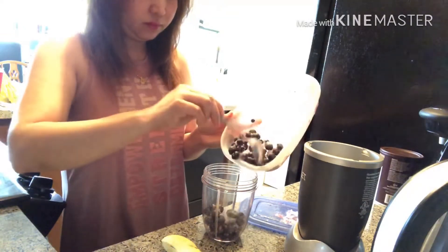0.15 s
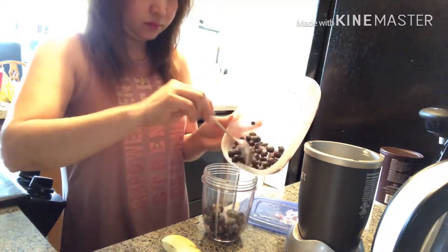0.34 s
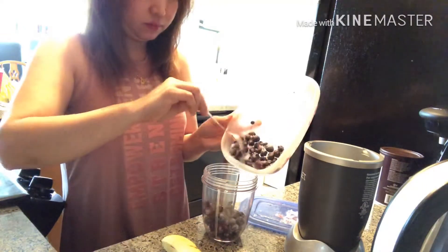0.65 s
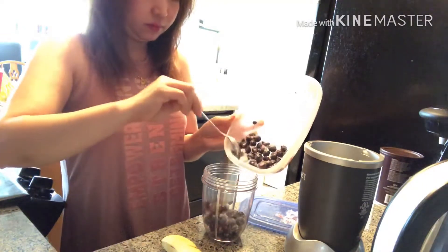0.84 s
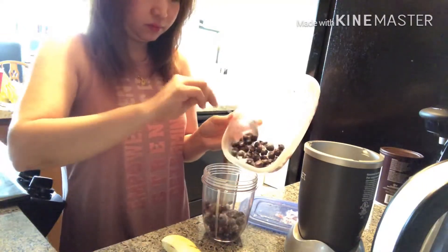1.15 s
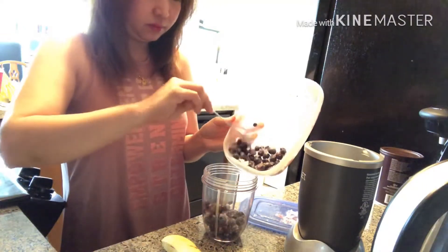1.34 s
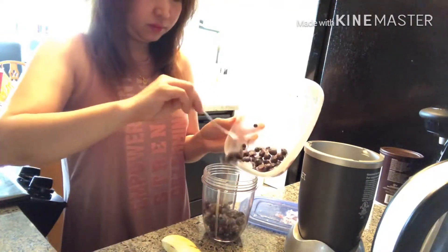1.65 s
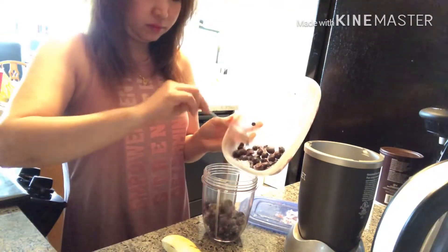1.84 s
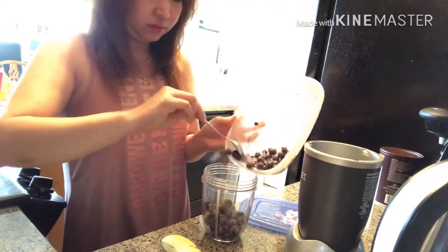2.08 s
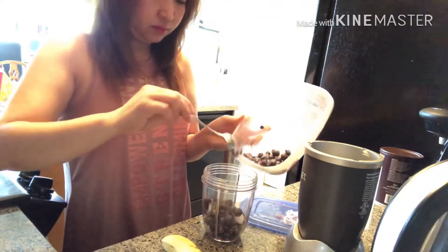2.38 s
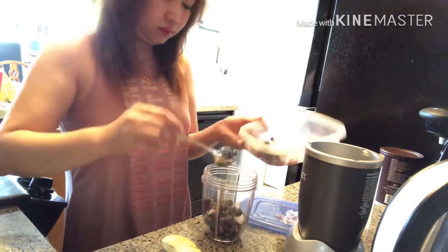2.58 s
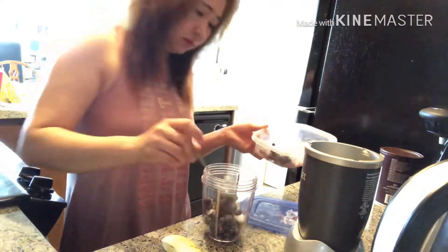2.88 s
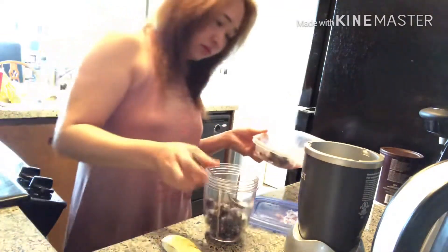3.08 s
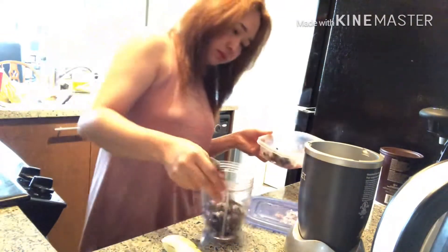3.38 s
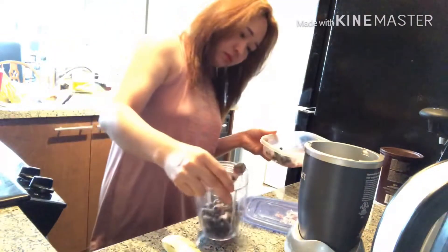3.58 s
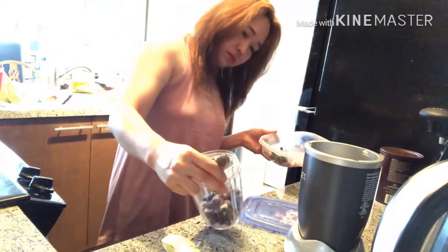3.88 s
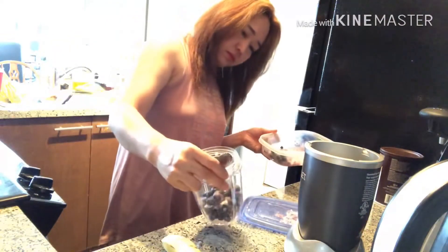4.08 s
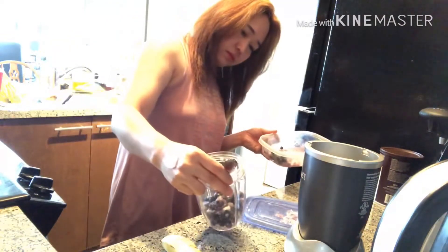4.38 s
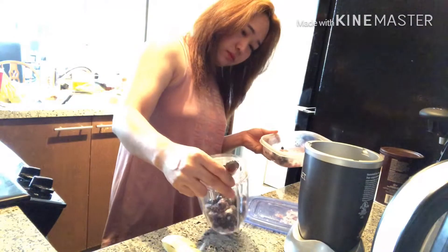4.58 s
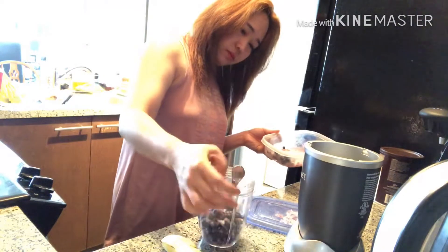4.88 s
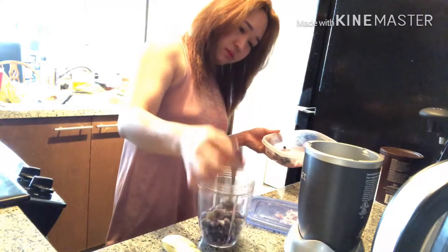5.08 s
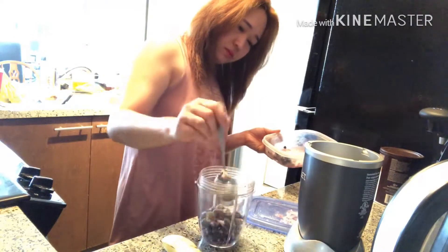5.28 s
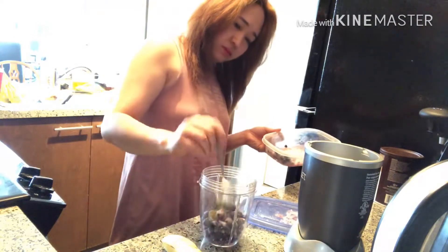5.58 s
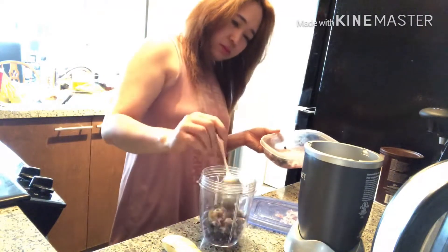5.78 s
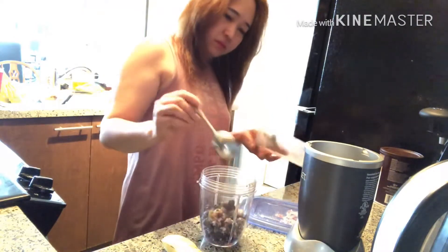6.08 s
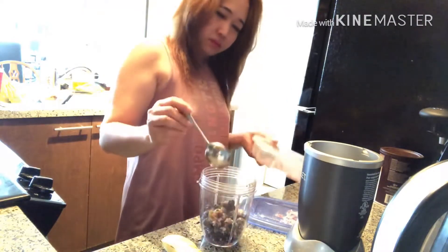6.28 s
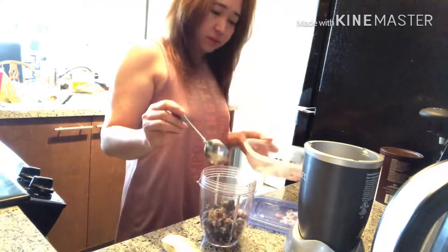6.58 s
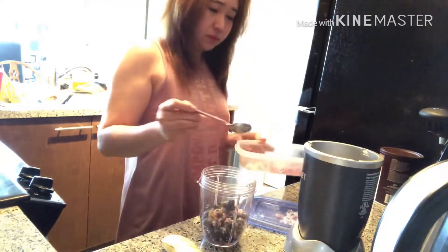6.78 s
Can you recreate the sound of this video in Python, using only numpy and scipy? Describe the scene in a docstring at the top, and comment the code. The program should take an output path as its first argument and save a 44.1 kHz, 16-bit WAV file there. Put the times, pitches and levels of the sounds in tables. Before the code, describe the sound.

A spoon scrapes frozen berries that clatter into a plastic cup, then a cup knock, spoon taps and a sliding plastic tub over faint fridge hum.

```python
"""A steel spoon scrapes frozen blueberries from a plastic tub; they clatter into a blender cup.
Each contact adds short filtered noise bursts to fading tones, and scraping is made of tiny random slips.
The cup is knocked on the stone counter, the spoon pokes and taps in it, and the tub slides away.
A small kitchen answers with fading noise echoes, and a fridge hums in a few slightly unsteady tones."""
import sys
import numpy as np
from scipy import signal
from scipy.fft import rfft, irfft, next_fast_len
from scipy.io import wavfile
from scipy.ndimage import uniform_filter1d, map_coordinates

SR = 44100
rng = np.random.default_rng(int(sys.argv[2]) if len(sys.argv) > 2 else 0)


def int16_out(signal):
    """Quantize to a 16-bit WAV file."""
    q = np.round(np.clip(np.atleast_2d(signal).T, -1, 1) * 32767)
    wavfile.write(sys.argv[1], SR, q.astype(np.int16))


N = 306043  # length of the scene in samples

# Strokes of the spoon through the berries.
# Each row: start in seconds, length in seconds, level in dB, frost hiss relative to the scrape in dB.
STROKES = [(0, 0.11, -37.5, -12), (.288, .11, -35, -14), (0.518, 0.13, -39.5, -16), (.752, .035, -28, -9),
           (.783, .085, -25, -13), (0.889, 0.12, -38, -12.5), (1.32, 0.054, -25.5, -10.5),
           (1.373, 0.24, -37.5, -15), (1.611, 0.19, -35.5, -13.5), (1.998, 0.073, -28, -6),
           (2.056, 0.036, -25.5, -7), (2.1, 0.071, -24, -10.5), (2.231, 0.13, -37, -12),
           (2.5, .08, -56.5, -5.5), (5.458, .06, -40.5, -15.5), (5.743, 0.054, -37.5, -9.5),
           (5.976, 0.035, -40.5, -16.5)]
# Colours of the scrape and of the frost. Each row: frequency in Hz, gain in dB.
SCRAPE_COLOUR = [(88, -41), (150, -2), (186, -13), (206, -26.5), (400, -1.5), (442, -28), (549, 2),
                 (717, -8), (1090, -0.5), (1200, -7), (1570, 1), (2010, -2.5), (3000, -2.5), (8000, -11),
                 (10400, -32), (17600, -120)]
FROST_COLOUR = [(3500, -29.5), (6000, -20), (7600, 0.5), (9000, 2), (12000, -1), (16000, -4.5)]
JERK_DB, JERKS_PER_S = 2, 45  # the spoon catches and slips as it goes

# Berries knocking together: rate, typical pitch, spread either way, cycles to fade by 60 dB.
TUMBLES_PER_S, TUMBLE_HZ, TUMBLE_OCTAVES, TUMBLE_CYCLES = 110, 1900, 1.3, 26
TUMBLE_DB = -6  # against the stroke that stirs them

# Hard contacts of berries and spoon with plastic.
# Each row: start in seconds, strength in dB, hollow of the cup relative to it in dB, brightness in dB.
CONTACTS = [(.0054, -21.5, -13.5, -7), (.021, -23.5, -6.5, 5.5), (.041, -21, -25, 1.5),
            (0.075, -32.5, -9, 1.5), (.129, -17, -16.5, -3.5), (.197, -35.5, -9, -1.5),
            (0.2882, -24.5, -12, 7), (0.363, -21.5, -16, 8.5), (0.4287, -21.5, -15.5, -9),
            (0.473, -31, -5, -5.5), (0.5095, -28, -5.5, -3), (.5696, -40.5, -3, -4), (.585, -16.5, -9, -3),
            (0.7188, -11.5, -14.5, -1.5), (.758, -12, -20, 5.5), (0.8508, -16, -25, -8.5),
            (0.967, -18.5, -19, -1), (1.0159, -14.5, -24, 3), (1.033, -24.5, -8.5, -2.5),
            (1.065, -23.5, -28, -12), (1.0774, -33.5, -30, -2), (1.102, -26.5, -21, 3),
            (1.1434, -28.5, -22, 3.5), (1.2767, -27, -13, -3.5), (1.3018, -23, -16, -2),
            (1.3216, -24, -7, 9), (1.5004, -20, -16.5, 8.5), (1.508, -14, -18, 2), (1.52, -21.5, -25, -3.5),
            (1.5831, -11.5, -13.5, 5), (1.6507, -26.5, -14, 7.5), (1.697, -22, -27.5, 11),
            (1.74, -25, -26, 6), (1.7863, -22.5, -11, -6), (1.8287, -24, -18.5, -3.5), (1.861, -26, -11, 0),
            (1.885, -22, -26, 6), (1.9975, -25, -8.5, 3), (2.022, -16.5, -21.5, 7.5), (2.15, -13, -26.5, 1),
            (2.174, -14, -24.5, 4.5), (2.2209, -15.5, -29, 5.5), (2.2544, -14.5, -13.5, 3),
            (2.328, -17, -10.5, -2.5), (2.367, -5.5, -22, 1.5), (2.4, -17, -21, -9.5),
            (2.436, -32.5, -31.5, 8), (2.485, -22.5, -11.5, 7.5), (2.5235, -28, -26.5, 11),
            (2.7557, -26.5, -29, 5.5), (2.9524, -30, -4, -9), (3.053, -32.5, -9.5, -5),
            (3.1009, -6.5, -16, 6), (3.121, -14.5, -5.5, -1.5), (3.133, -16, -21.5, -1.5),
            (3.5035, -19.5, -8.5, -4.5), (3.875, -47, -20.5, -6), (4.162, -55.5, -20, 0),
            (5.3253, -8.5, -13.5, -10), (5.447, -9.5, -23, 3.5), (5.538, -30.5, -8.5, 6.5),
            (5.6482, -34.5, -12, 0.5), (5.7364, -22, -14, 2.5), (5.7538, -15.5, -24.5, 1),
            (5.8602, -30, -16, 0.5), (5.979, -19, -16, -5), (5.9889, -13.5, -17.5, 1),
            (6.0616, -27, -27, -13.5), (6.4953, -16, -8, 0)]
# Colours of the snap, of the cup's hollow and of the bright crack. Each row: frequency in Hz, gain in dB.
SNAP_COLOUR = [(200, -43), (700, -29), (1500, -12), (2300, -8), (3000, 3), (3700, -2), (4400, 0),
               (5500, -6.5), (7000, -17), (9000, -29.5), (16000, -47.5)]
HOLLOW_COLOUR = [(45, -26), (130, -2), (230, -9), (400, -5), (550, -6), (720, 3.5), (1050, -8),
                 (1600, -31.5), (4000, -57)]
CRACK_COLOUR = [(1000, -58.5), (3000, -15.5), (6000, 2.5), (7600, 1.5), (9000, -3), (12000, -5),
                (16000, -5)]
# Tones of the plastic wall. Each row: frequency in Hz, level in dB, time to fade by 60 dB in seconds.
WALL_MODES = [(1390, -9.5, 0.012), (1622, -1.5, 0.025), (1690, 5, 0.012), (1837, -6.5, 0.032)]
SNAP_VARIES_DB = 3  # each contact point colours the snap differently
ORDINARY_DB = -22  # strength of an ordinary blow, the reference for everything that grows with strength
WALL_DB, CRACK_DB = -35, -40  # wall ring and bright crack of an ordinary contact
WALL_GROWS, CRACK_GROWS = 1, .82  # dB per dB of extra strength
WALL_DAMPING = 0.37  # dB of wall ring lost per dB of brightness

# Jolts of the cup, against the counter or by berries landing in it.
# Each row: start in seconds, strength in dB, nominal pitch in Hz, rattle relative to the strength in dB,
# delay in seconds until it rocks back.
KNOCKS = [(1.326, -26.5, 454, -6, .025), (1.886, -31, 653, 0.5, 0.027), (2.334, -30.5, 744, 1.5, 0.036),
          (2.368, -31.5, 764, 7.5, 0.011), (2.481, -56, 705, -13, 0.017), (2.875, -23, 763, -10.5, 0.022),
          (2.992, -32, 740, -4.5, 0.021), (3.104, -13.5, 850, -9, 0.018), (3.128, -18, 886, -12, .012),
          (3.174, -13.5, 722, -12.5, .022), (3.505, -21.5, 720, -15, 0.015),
          (3.849, -50.5, 720, -28, 0.017), (4.785, -18, 695, -16.5, 0.0046), (4.79, -2.5, 671, -12, .009),
          (4.928, -22.5, 688, -11, 0.028), (5.478, -31, 470, -2, .02), (5.756, -29.5, 812, -1.5, 0.018)]
# Tones of the loaded cup on the counter, at its resting pitch.
# Each row: frequency in Hz, level in dB, time to fade by 60 dB in seconds.
CUP_MODES = [(381.6, -8.5, 0.067), (452.3, -6, 0.075), (676.4, 3, 0.075), (773, 5.5, 0.033),
             (900, -26, 0.017)]
# Tones of the counter. Each row: frequency in Hz, level in dB, time to fade by 60 dB in seconds.
COUNTER_MODES = [(44.7, -19, .4), (98.5, -4, 0.095), (138.4, 3.5, 0.084), (210, -6.5, 0.014),
                 (293, 2, 0.032)]
# Colour of berries rattling in the cup. Each row: frequency in Hz, gain in dB.
RATTLE_COLOUR = [(200, -38.5), (500, -20), (1000, -17.5), (1600, 5.5), (2100, -8.5), (2800, 0.5),
                 (4400, -4.5), (7000, -12), (9000, -22.5), (16000, -21.5)]
CUP_HZ, LOAD_POWER = 655.6, 0.55  # resting pitch, and how closely the tones follow the pitch of a jolt
ROCK_DB, ROCK_GROWS = -26.5, 0.82  # rocking back: level after an ordinary jolt, dB per dB of strength
ROCK_PITCH, ROCK_RATTLE_DB = 0.928, -5  # rocking back: pitch ratio, change of rattle
THUD_DB, THUD_GROWS = -38.5, 0.5  # counter thud under an ordinary jolt, dB per dB of strength

# Moments when the spoon is set ringing. Each row: start in seconds, level in dB.
SPOON_HITS = [(0.129, -60), (1.583, -47), (3.101, -32), (3.503, -63), (5.447, -37)]
# Tones of the steel spoon. Each row: frequency in Hz, level in dB, time to fade by 60 dB in seconds.
STEEL_MODES = [(2902, -6, .14), (3548, -7, .2), (3989, -8, .2), (4400, -7, .25), (5570, -6, .2),
               (6379, -6, .33), (7815, -7, .2), (8565, -8, .26), (8764, -7, .11), (9959, 1, .11),
               (12600, -16, .32), (14090, -8, .2)]

# The tub is dragged twice, one list of points each. Each row: time in seconds, level of the push in dB.
PUSHES = [
    [(2.72, -58.5), (2.762, -49.5), (2.77, -43.5), (3.06, -47.5), (3.09, -52.5)],
    [(6.23, -69.5), (6.314, -37), (6.392, -28.5), (6.432, -33.5), (6.45, -27), (6.626, -37.5),
     (6.68, -18.5), (6.832, -54.5), (6.876, -46), (6.94, -58)],
]
# Colour of the rubbing tub. Each row: frequency in Hz, gain in dB.
TUB_COLOUR = [(74, -52.5), (125, -7.5), (187, -13.5), (226, -17), (331, -8), (368, -12), (568, -5),
              (991, -3), (1100, 2), (1240, -7.5), (1400, -1.5), (1610, -9), (2290, -8), (8000, -16.5),
              (10400, -44), (17600, -120)]

# Berries shift in the cup while it is held. Each row: start in seconds, length in seconds, level in dB.
SETTLING = [(3.15, 0.8, -61), (3.95, 0.92, -86), (4.8, .4, -68)]
# Colour of the shifting berries. Each row: frequency in Hz, gain in dB.
SHIFT_COLOUR = [(500, -2), (900, -6.5), (2000, -7), (4000, -5.5), (7500, -17), (9000, -18.5),
                (16000, -23.5)]

# Tones of the fridge. Each row: frequency in Hz, average (rms) level in dB.
HUM = [(119.5, -61.5), (179.5, -55.5), (300.5, -72)]
# Colour of the still room air. Each row: frequency in Hz, gain in dB.
AIR_COLOUR = [(20, -47), (33, -31.5), (48, -2), (130, 2), (190, -8), (250, -5), (520, -14.5), (1000, -13.5),
              (2000, -25), (4000, -28), (7800, -31), (9000, -37), (16000, -37.5)]
# How long the kitchen echoes. Each row: frequency in Hz, time to fade by 60 dB in seconds.
KITCHEN_T60 = [(50, 1), (130, 1), (300, 0.66), (700, 0.46), (1500, 0.31), (3500, 0.38), (8000, 0.31),
               (15000, 0.29)]

BASS_CUT_HZ, TOP_HZ = 44, 16000  # lower and upper limits of the finished sound


def scraping():
    """The spoon grinds jerkily over icy skins and plastic, and frost crumbles with a fine hiss."""
    slips = grains(rate=700, spread_db=3, tint_db=7, life=.0018)
    catches = grains(rate=130, spread_db=2, tint_db=12, life=.0025)
    grind = amp(-3.0) * unit(coloured(slips + catches, SCRAPE_COLOUR))
    frost = unit(coloured(slips, FROST_COLOUR))
    out = np.zeros(N)
    for s, length, db, frost_db in STROKES:
        stroke = effort([(s, length, db)], rise=0.063, sag_db=4.5, release=.06)
        out += stroke * (grind + amp(frost_db) * frost)
    return out * amp(JERK_DB * wobble(JERKS_PER_S))


def tumbling(count=40):
    """Berries stirred by a stroke knock together at random moments, each with its own loudness and short pitch."""
    out = np.zeros(N)
    t = np.arange(SR // 20) / SR
    for s, length, db, _ in STROKES:
        for moment, pitch, size in rng.random((count, 3)):
            wait = moment * count / TUMBLES_PER_S
            hz = TUMBLE_HZ * 2 ** (TUMBLE_OCTAVES * (2 * pitch - 1))
            if wait < length:  # only while the stroke lasts
                fade = amp(-60 * t * hz / TUMBLE_CYCLES)
                knock = np.sin(2 * np.pi * hz * t) * fade * (1 - np.exp(-t * hz))
                add(out, s + wait, amp(db + TUMBLE_DB) * 2 * size * blow(knock))
    return out


def clicks():
    """Each contact snaps and stirs the cup's hollow; dull ones ring the plastic wall more, bright ones crack more."""
    out = np.zeros(N)
    for s, db, hollow_db, bright_db in CONTACTS:
        wall_db = follow(db, WALL_DB, WALL_GROWS) - WALL_DAMPING * bright_db
        crack_db = follow(db, CRACK_DB, CRACK_GROWS) + bright_db
        snap = burst(varied(SNAP_COLOUR, SNAP_VARIES_DB), t60=0.022, attack=0.0018)
        wall = ring(WALL_MODES, scatter_db=10.0, detune=0.045, attack=0.001)
        hollow = burst(HOLLOW_COLOUR, t60=0.067, attack=0.00027)
        crack = burst(CRACK_COLOUR, t60=0.037, attack=0.00027)
        add(out, s, amp(db - 11.5) * snap)
        add(out, s, amp(wall_db) * wall)
        add(out, s, amp(db + hollow_db - 5.0) * hollow)
        add(out, s, amp(crack_db) * crack)
    return out


def knocks():
    """The cup's base rings low, the berries rattle in it, and the counter thuds a moment later."""
    out = np.zeros(N)
    for s, db, hz, rattle_db in landings():
        pitch = (hz / CUP_HZ) ** LOAD_POWER
        base = ring(CUP_MODES, scatter_db=2, detune=.005, attack=.0016, pitch=pitch)
        hollow = burst(HOLLOW_COLOUR, t60=0.078, attack=0.00068)
        rattle = burst(RATTLE_COLOUR, t60=0.036, attack=.0005)
        thud = ring(COUNTER_MODES, scatter_db=1, detune=.07, attack=.005)
        add(out, s, amp(db - 7.5) * base)
        add(out, s, amp(db - 13.5) * hollow)
        add(out, s, amp(db + rattle_db - 3.5) * rattle)
        add(out, s + .0068, amp(follow(db, THUD_DB, THUD_GROWS)) * thud)
    return out


def landings():
    """A jolted cup lands on one edge, then rocks back onto the other, lower and usually softer."""
    for s, db, hz, rattle_db, rock_s in KNOCKS:
        yield s, db, hz, rattle_db
        rock_db = follow(db, ROCK_DB, ROCK_GROWS)
        yield s + rock_s, rock_db, hz * ROCK_PITCH, rattle_db + ROCK_RATTLE_DB


def spoon():
    """The steel rings briefly, damped by the fingers."""
    out = np.zeros(N)
    for s, db in SPOON_HITS:
        add(out, s, amp(db) * ring(STEEL_MODES, scatter_db=3, detune=.002, attack=.0004))
    return out


def sliding():
    """The tub's plastic base rubs along in dense small slips; rub and hiss both follow the push."""
    t = np.arange(N) / SR
    push = np.zeros(N)
    for rows in PUSHES:
        times, levels_db = np.transpose(rows)
        push += amp(np.interp(t, times, levels_db, left=-np.inf, right=-np.inf))  # silent outside
    slips = grains(rate=800, spread_db=3, tint_db=7, life=.002)
    rub = amp(0.5) * unit(coloured(slips, TUB_COLOUR))
    hiss = amp(-10.5) * unit(coloured(slips, FROST_COLOUR))
    return push * (rub + hiss)


def settling():
    """Berries shift against each other with faint small ticks."""
    ticks = grains(rate=75, spread_db=2, tint_db=12, life=.007)
    return effort(SETTLING, rise=.15, sag_db=5.0, release=.5) * unit(coloured(ticks, SHIFT_COLOUR))


def fridge():
    """A hum of slightly unsteady tones over still room air, which is filtered noise."""
    t = np.arange(N) / SR
    hum = np.zeros(N)
    for hz, db in HUM:
        level = amp(db + 1.3 * wobble(4)) * np.sqrt(2)  # a sine's peak is sqrt(2) times its rms
        hum += level * np.sin(2 * np.pi * hz * t + 0.2 * wobble(3))
    return hum + amp(-60) * unit(coloured(rng.standard_normal(N), AIR_COLOUR))


def kitchen(x, gap, early_db, early_t60, count=24):
    """Near surfaces answer first, then the room's tail; the noise echo is redrawn for each stretch of time."""
    out = np.zeros(N)
    for place in np.array_split(np.arange(N), count):
        hz, t, z = signal.stft(rng.standard_normal(SR * 2 // 3), SR, nperseg=256)
        late = amp(-60 * t / along(KITCHEN_T60, hz)[:, None])
        early = amp(early_db - 60 * t / early_t60)
        echo = signal.istft(z * (late + early), SR, nperseg=256)[1]
        add(out, place[0] / SR + gap, signal.fftconvolve(x[place], echo / np.linalg.norm(echo)))
    return out


def grains(rate, spread_db, tint_db, life, count=9):
    """Friction: tiny slips at random moments, each a brief puff with its own size and colour."""
    sizes = amp(spread_db * np.clip(rng.standard_normal(N), -1.7, 1.7))
    slips = (rng.random(N) < rate / SR) * sizes
    m = next_fast_len(N)
    noise = rfft(rng.standard_normal(m))
    band = np.digitize(np.fft.rfftfreq(m, 1 / SR), np.geomspace(500, 11000, count - 1))
    out = np.zeros(N)
    for k in range(count):  # each frequency band gets its own random strength for every slip
        tinted = slips * amp(tint_db * rng.uniform(-0.3, 1, N))
        power = signal.lfilter([1], [1, -np.exp(-1 / (life * SR))], tinted ** 2)  # each puff fades
        out += irfft(noise * (band == k), m)[:N] * np.sqrt(power)
    return unit(out)


def burst(spectrum, t60, attack):
    """Many crowded resonances struck at once: coloured noise that dies away."""
    t = np.arange(SR // 6) / SR
    envelope = amp(-60 * t / t60) * (1 - np.exp(-t / attack))
    return blow(coloured(rng.standard_normal(len(t)) * envelope, spectrum))


def ring(modes, scatter_db, detune, attack, pitch=1):
    """Fading tones of a struck body; each contact point gives them new strengths and slight detuning."""
    t = np.arange(SR // 2) / SR
    hz, db, t60 = np.transpose(modes)[:, :, None]
    size, shift = rng.uniform(-1.09, 1, (2, len(modes), 1))
    waves = np.sin(2 * np.pi * hz * pitch * (1 + detune * shift) * t)
    fades = amp(db + scatter_db * size - 60 * t / t60)
    return blow(np.sum(fades * waves, axis=0) * (1 - np.exp(-t / attack)))


def effort(rows, rise, sag_db, release):
    """Gain of hand movements: each builds over a share of its length, sags, then falls 60 dB in release seconds."""
    gain = np.zeros(N)
    for start, length, db in rows:
        t = np.arange(N) / SR - start
        done = np.clip(t / length, 0, 1)
        fade_db = 60 * np.maximum(t - length, 0) / release
        gain += np.minimum(done / rise, 1) * amp(db - sag_db * done - fade_db)
    return gain


def follow(db, level_db, grows):
    """Level of a part of a blow: level_db for an ordinary blow, and grows dB more for each dB of strength."""
    return level_db + grows * (db - ORDINARY_DB)


def varied(spectrum, depth_db):
    """The same colour with each of its points raised or lowered by chance."""
    return [(hz, db + depth_db * rng.uniform(-1, 1)) for hz, db in spectrum]


def coloured(x, spectrum):
    """Filter with the gain of the (Hz, dB) points, arranged so that nothing sounds before its cause."""
    m = 2 * next_fast_len(len(x))
    cepstrum = irfft(np.log(amp(along(spectrum, np.fft.rfftfreq(m, 1 / SR)))))
    cepstrum[1:m // 2] *= 2  # folding the cepstrum forward in time gives minimum phase
    cepstrum[m // 2 + 1:] = 0
    return irfft(rfft(x, m) * np.exp(rfft(cepstrum)), m)[:len(x)]


def along(points, hz):
    """Read (Hz, value) points on a logarithmic frequency axis."""
    f, v = np.transpose(points)
    return np.interp(np.log(hz + 1), np.log(f + 1), v)


def wobble(rate):
    """A smooth random curve through rate random points a second."""
    return map_coordinates(rng.standard_normal(int(N * rate / SR) + 4), [np.arange(N) * rate / SR])


def add(track, s, sound):
    """Mix a sound into the track at time s in seconds."""
    part = track[max(round(s * SR), 0):][:len(sound)]
    part += sound[:len(part)]


def amp(db):
    """Turn decibels into gain."""
    return 10 ** (np.asarray(db) / 20)


def unit(x):
    """Scale to an average (rms) level of 1."""
    return x / np.sqrt(np.mean(x ** 2) + 1e-20)


def blow(x):
    """Scale a short sound so that its loudest 5 milliseconds have rms 1."""
    return x / np.sqrt(np.max(uniform_filter1d(x ** 2, size=220)) + 1e-20)


def scene():
    """Everything happens on the counter, close to the microphone."""
    bright = scraping() + tumbling() + clicks() + spoon() + sliding() + settling()
    low = knocks()
    room = kitchen(amp(-7) * bright + amp(-9.0) * low, gap=.005, early_db=4.0, early_t60=0.058)
    return (amp(-1.27) * bright + low + room + fridge())[None]


def record(dry):
    """The microphone drops the deepest bass, and the recorder keeps nothing above its band limit."""
    m = next_fast_len(N + SR // 2)
    bass_cut = signal.butter(4, BASS_CUT_HZ, "high", fs=SR, output="sos")
    thinned = signal.sosfilt(bass_cut, dry)
    kept = np.fft.rfftfreq(m, 1 / SR) < TOP_HZ
    return irfft(rfft(thinned, m) * kept, m)[..., :N]


dry = scene()
out = record(dry)
int16_out(out)
```